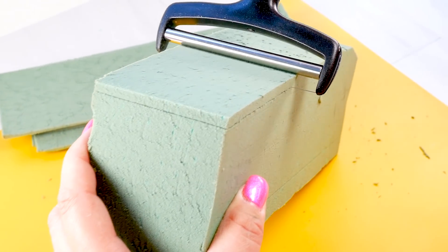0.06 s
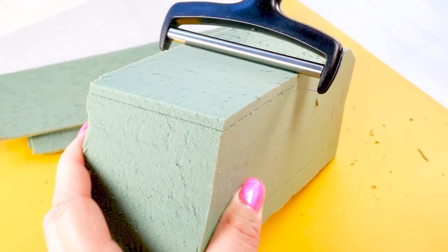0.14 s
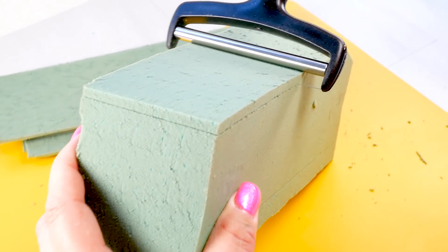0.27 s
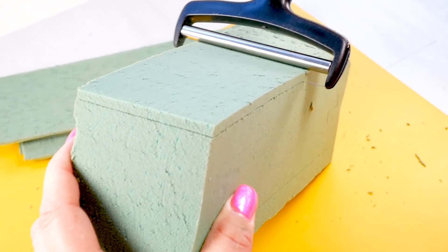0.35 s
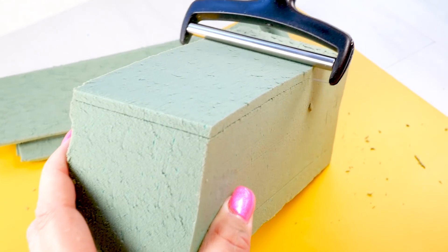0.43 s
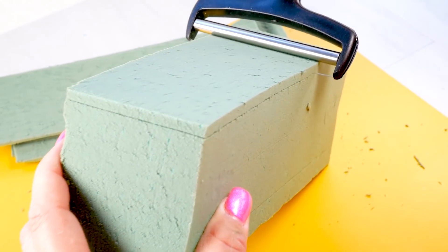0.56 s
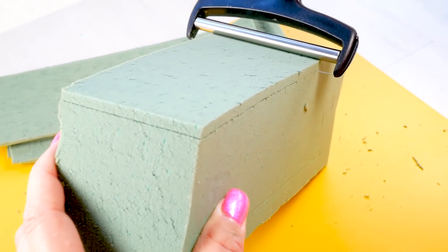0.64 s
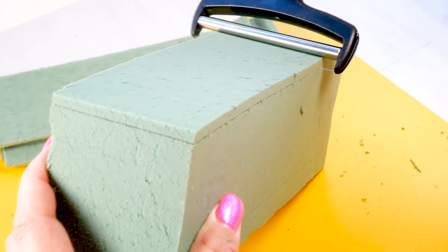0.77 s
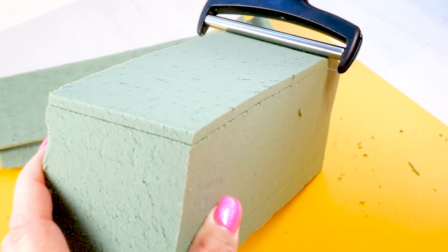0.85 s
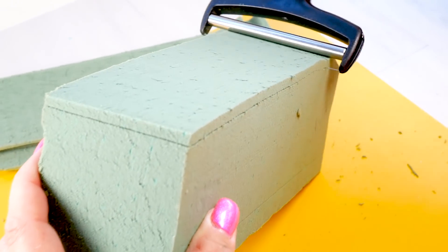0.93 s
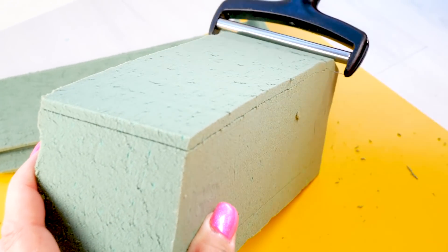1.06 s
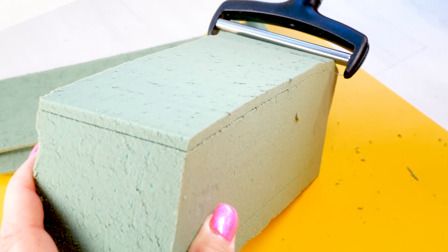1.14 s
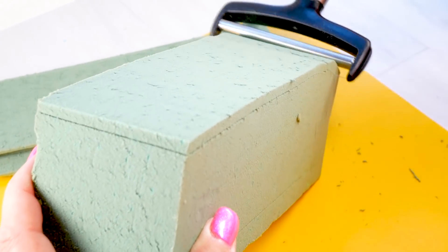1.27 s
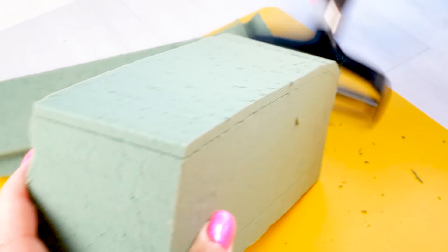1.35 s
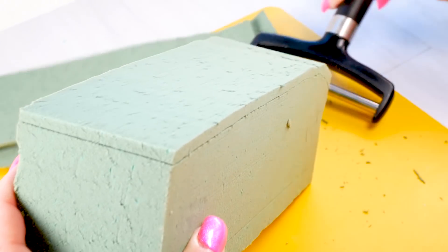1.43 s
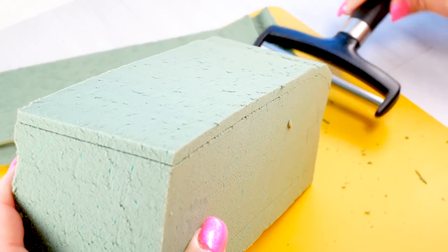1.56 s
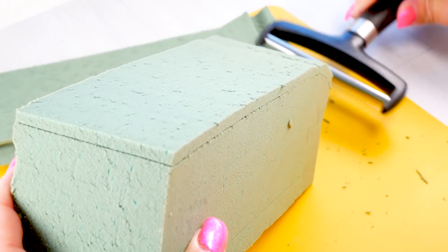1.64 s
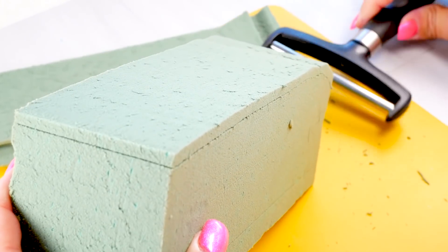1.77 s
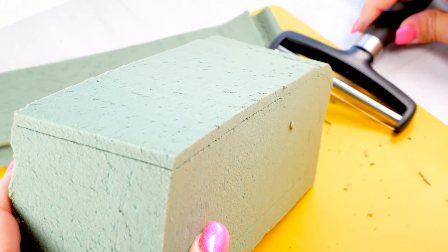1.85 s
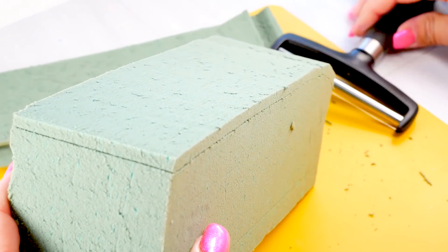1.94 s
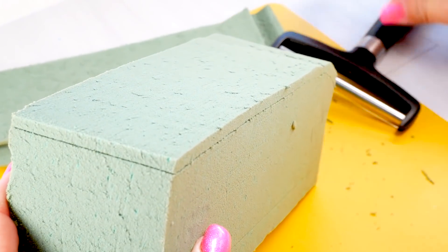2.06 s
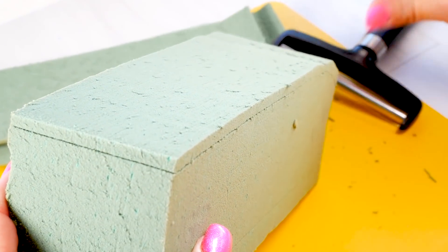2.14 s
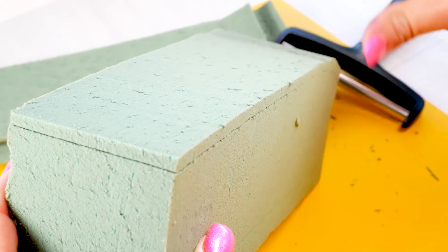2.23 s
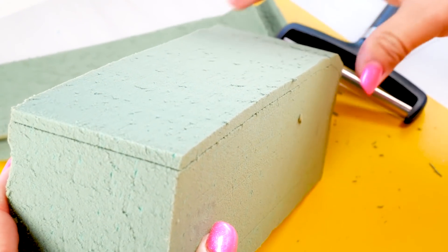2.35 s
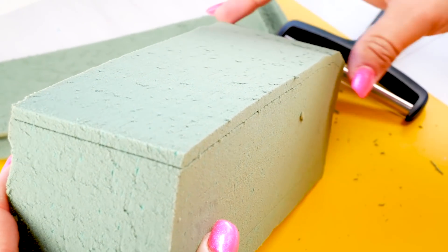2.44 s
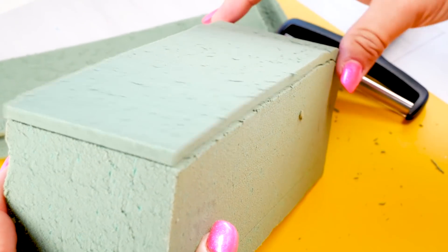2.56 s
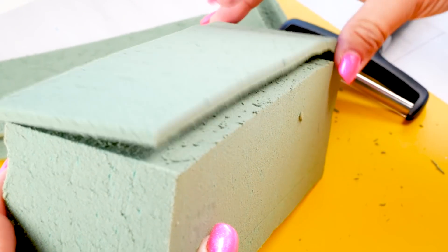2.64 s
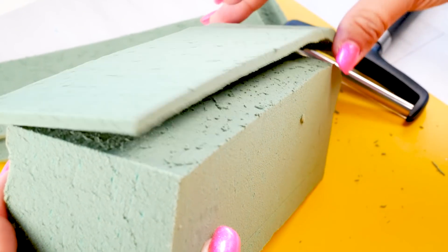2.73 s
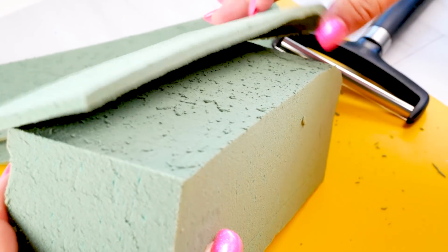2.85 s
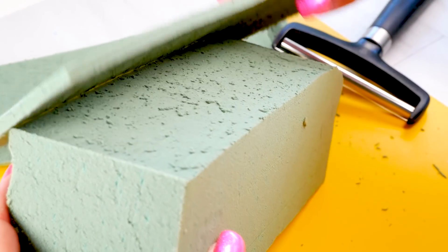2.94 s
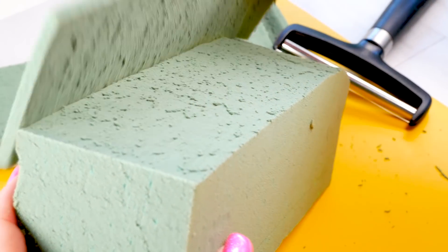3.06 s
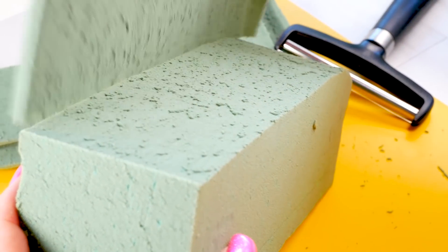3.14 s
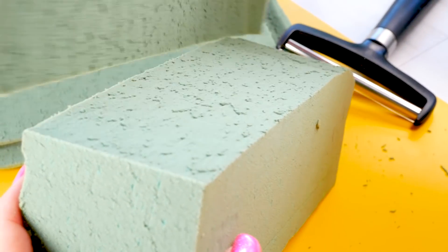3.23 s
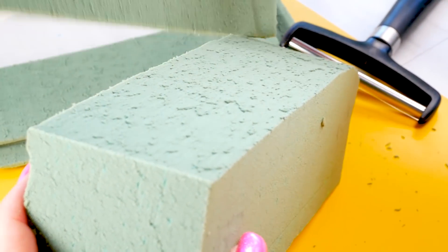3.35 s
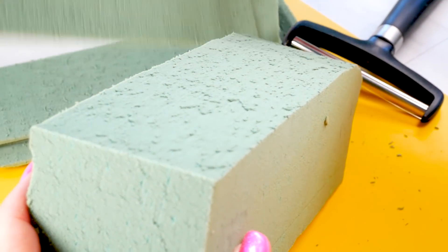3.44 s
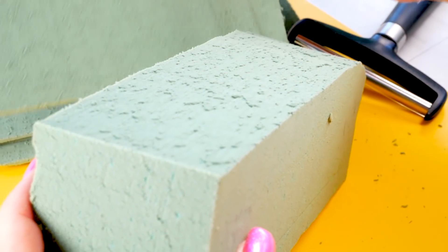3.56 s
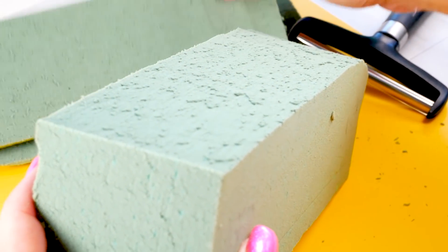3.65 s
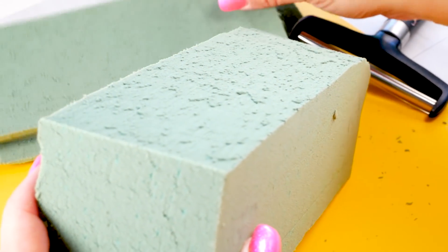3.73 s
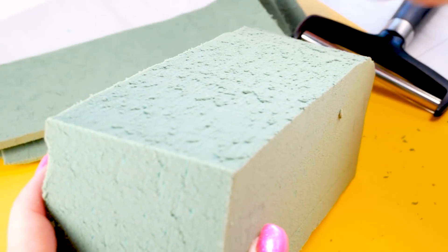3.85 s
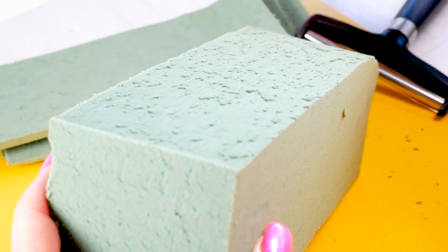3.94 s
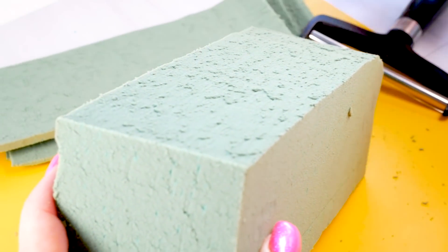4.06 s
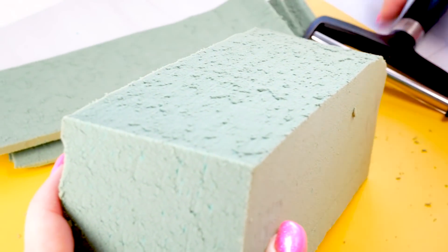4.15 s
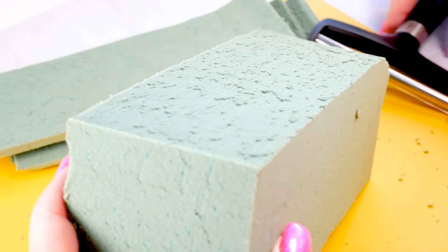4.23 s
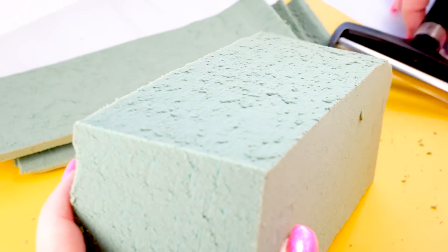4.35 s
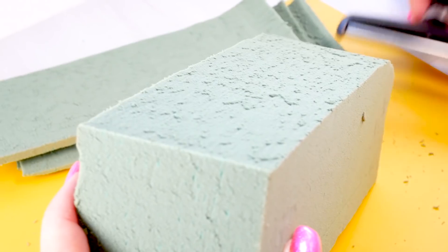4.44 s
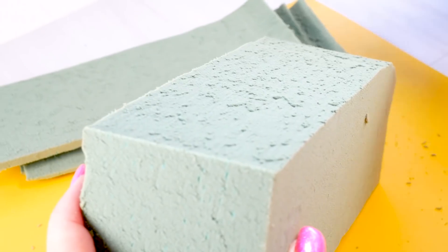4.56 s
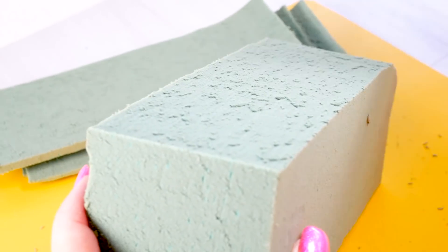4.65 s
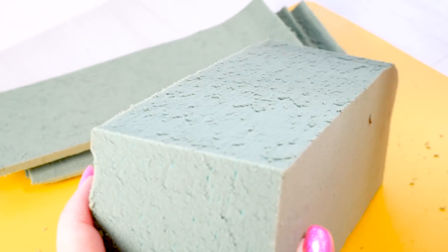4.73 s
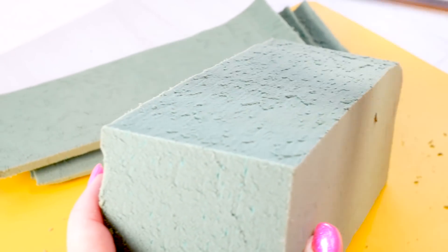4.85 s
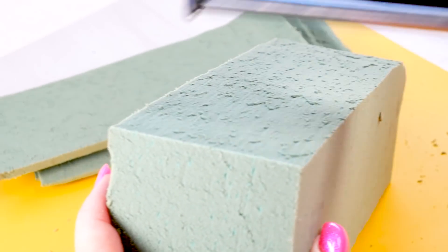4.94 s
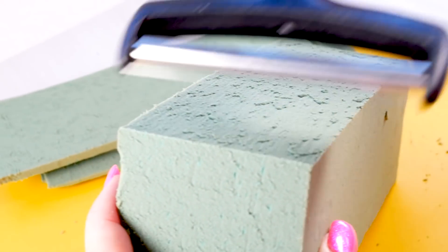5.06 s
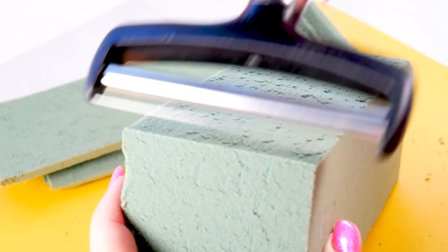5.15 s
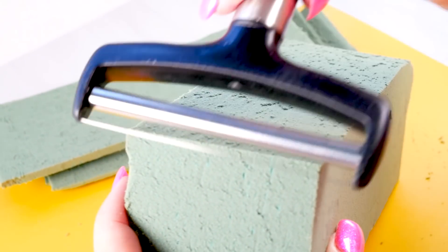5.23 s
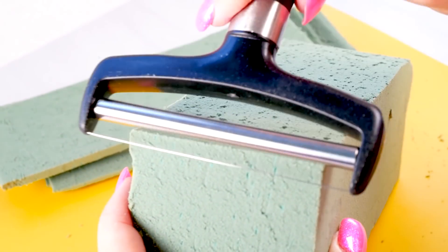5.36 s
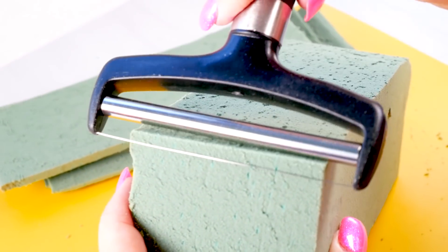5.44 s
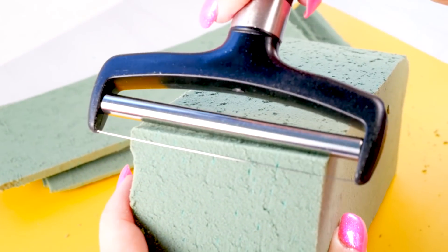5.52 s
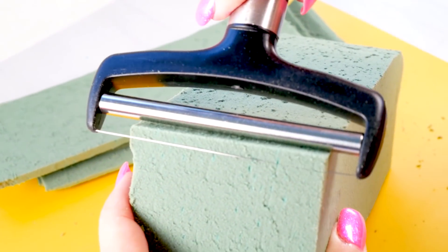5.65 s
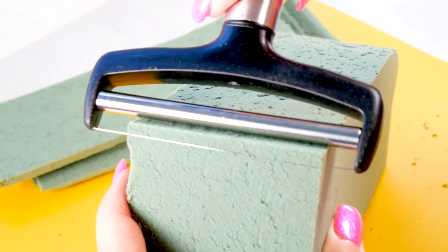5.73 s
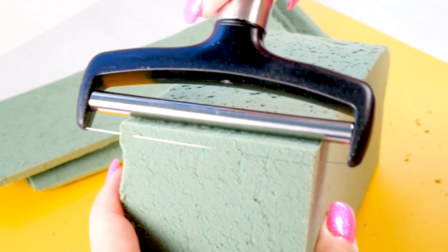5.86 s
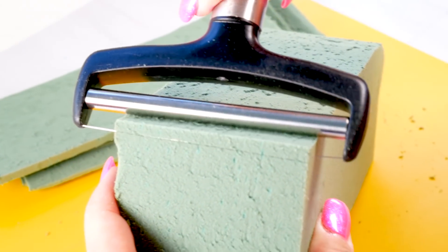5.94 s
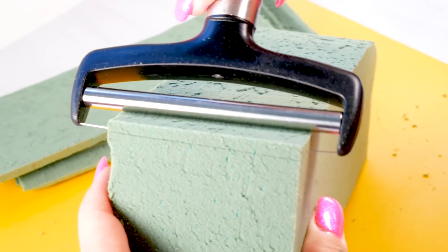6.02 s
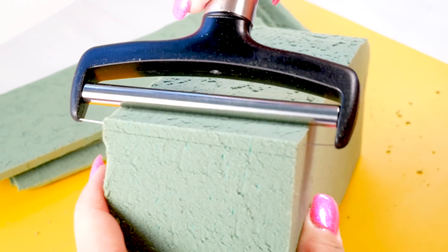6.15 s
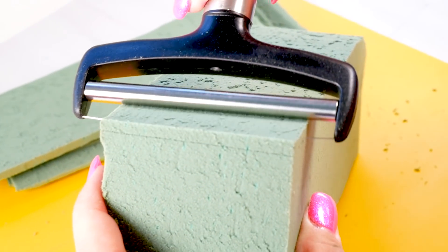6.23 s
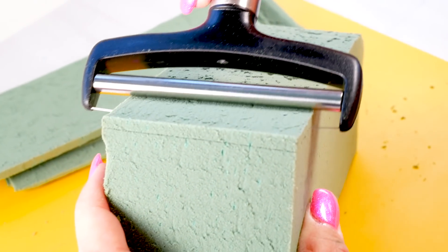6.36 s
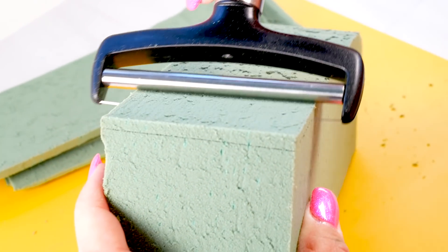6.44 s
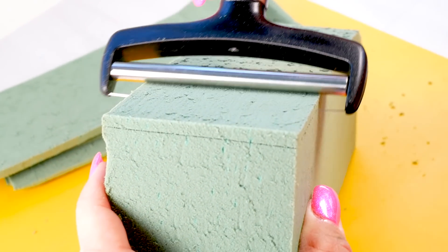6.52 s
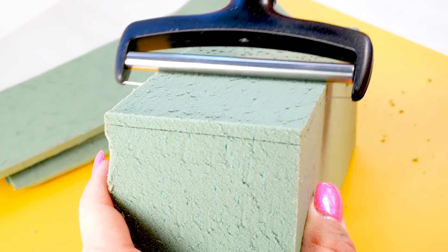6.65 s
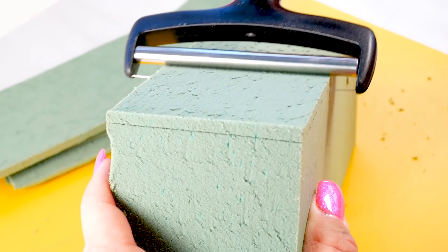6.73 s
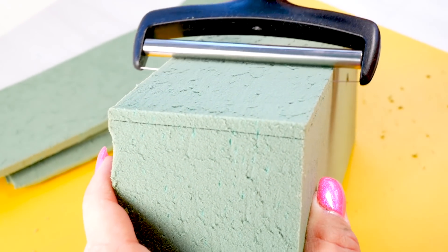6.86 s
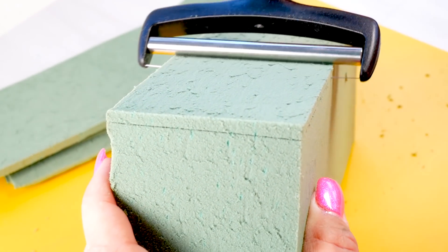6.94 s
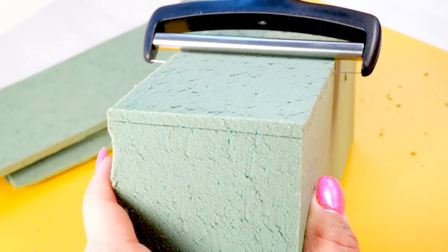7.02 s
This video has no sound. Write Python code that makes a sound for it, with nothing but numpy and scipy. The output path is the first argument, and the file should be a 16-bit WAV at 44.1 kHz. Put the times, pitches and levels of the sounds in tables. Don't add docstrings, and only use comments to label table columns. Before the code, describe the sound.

A wire slicer rasps crunchily through dry foam, pops out with a metallic rattle, knocks down on a table, then soft scuffs precede a new cut.

```python
import sys
import numpy as np
from scipy import signal
from scipy.fft import rfft, irfft, next_fast_len
from scipy.io import wavfile
from scipy.ndimage import uniform_filter1d

SR = 44100
rng = np.random.default_rng(int(sys.argv[2]) if len(sys.argv) > 2 else 0)


def persist_wave(psi):
    counts = np.round(np.clip(psi, -1, 1) * 32767).astype(np.int16)
    wavfile.write(sys.argv[1], SR, np.atleast_2d(counts).T)


def linear_from_db(decibels):
    return 10 ** (np.asarray(decibels, float) / 20)


N = 312669

# (low [Hz], high [Hz])
ZONES_HZ = [
    [130, 370],
    [620, 1000],
    [1500, 3200],
    [4800, 15500],
]
# (frequency [Hz], density [dB per Hz])
CUT_COLOUR = [(71, -47), (126, -6), (390, -3.5), (469, -3.5), (881, 3), (1190, -2.5), (1460, -4),
              (2390, -3.5), (3580, -2), (4480, -7), (9710, -8.5), (14000, -14), (15500, -19)]
RUB_COLOUR = [(71, -38.5), (120, 0.5), (200, -7.5), (265, 1), (541, -7.5), (748, -10), (917, -7.5),
              (2160, -10), (2870, -11), (9510, -10), (13000, -11.5), (15500, -24.5)]
ROOM_COLOUR = [(12, -36), (20, -9.5), (37, -3.5), (64, -6.5), (98, -21.5), (171, -19.5), (238, -19),
               (274, -12.5), (315, -29), (393, -29.5), (491, -29.5), (534, -19), (649, -31), (834, -32),
               (1300, -37), (15500, -51)]
# (frequency [Hz], rms [dB])
HUM = [(60, -54), (120, -74), (176, -65)]
# (frequency [Hz], side minus mid [dB])
WIDTH = [(60, -23), (110, -25), (200, -25), (380, -27), (700, -18.5), (1290, -10.5), (2380, -13),
         (4400, -11), (8120, -18), (15000, -7.5)]
# (time [s], left minus right [dB])
SLICER_PAN = [(1.6, 0), (1.7, -2.4), (2.0, -2.4), (2.02, 0), (4.1, 0), (4.2, -3), (4.5, -3), (4.6, 0)]

# (frequency [Hz], level [dB], t60 [s])
FRAME = [(964, -12, 0.07), (1350, -21, .05), (1580, -12, 0.04), (1756, -19.5, 0.035), (2100, -20.5, 0.046),
         (2480, -15, 0.04), (2916, -18.5, 0.027), (3233, -18.5, 0.028)]
FACE = [(1380, 8, .004)]
TABLE = [(138.9, -24.5, 0.27), (224, -24.5, 0.04), (347, -15, 0.14), (453, -8, 0.028), (750, -27.5, 0.023)]
ROLLER = [(10380, -15, .06), (11800, -19, .06), (13010, -8, .14), (13335, -12, .16)]
ROLLER_BENDING = [(1480, -2, .04), (3350, -10, .04), (5240, -24, .08)]
# (frequency [Hz], level [dB], t60 [s])
TUBE_LOW = [(2500, -6, .05), (2875, -5, .08), (5060, -3, .12), (5240, -1, .11)]
TUBE_HIGH = [(7270, -4, .12), (7820, 0, .12)]

# (frequency [Hz], width [Hz], lift [dB])
BLOCK_END = [(480, 36, -3.5), (664, 150, 4), (880, 180, 2), (1439, 140, 2.5), (1930, 490, -5.5),
             (2567, 230, -4), (3640, 370, -9), (5220, 200, -12), (7400, 57, -6), (9980, 2500, -6)]
BLOCK_START = [(510, 420, 0.5), (774, 600, -5), (1600, 330, -7.5), (2950, 180, -8.5), (4633, 170, -6.5),
               (6150, 58, 1), (10100, 4300, -6.5)]
SHEET = [(745, 36, 6.5), (1725, 110, -14.5), (2130, 330, -3), (3440, 570, -5.5), (5370, 189, -13),
         (9460, 600, -11)]
SLICER = [(748, 170, -0.5), (1440, 180, -2), (2320, 160, -1.5), (3483, 480, -4), (4800, 190, -1.5)]
SQUEAK = [(2220, 270, 12.36)]
# (from [s], to [s], resonances)
CUT_BODIES = [
    (0, 1.8, BLOCK_END),
    (5.5, 8, BLOCK_START),
]
RUB_BODIES = [
    (1.6, 2.3, SLICER),
    (2.3, 4.1, SHEET),
    (4.1, 5.7, SLICER),
    (4.22, 4.325, SQUEAK),
]

# (time [s], frequency [Hz], width [Hz], lift [dB])
FLAP_FIRST = [(.05, 618, 120, 0.5), (.1, 620, 120, 10.5), (.25, 636, 150, 7), (.5, 719, 200.2, 4),
              (.62, 480, 90, 8.5), (.8, 480, 90, 9), (.86, 870, 120, 7.5), (.97, 813, 150, 2),
              (1.1, 823.5, 200.2, 9.5)]
WIRE_FIRST = [(.1, 2500, 300, -2), (.26, 1500, 250, 0), (.39, 2100, 300, 2.5), (.55, 2100, 400, 0.5),
              (.7, 1587, 300, -5), (.87, 1820, 300, 4.5), (.97, 1700, 300, 1), (1.09, 1807, 300, 11.5),
              (1.15, 1800, 300, 4.5)]
FLAP_SECOND = [(6.0, 802, 200, 0), (6.2, 864, 150, 3.5), (6.4, 604, 150, 3), (6.48, 820, 150, 3),
               (6.62, 712, 200, 6.5), (6.78, 519, 119.8, 6.5), (6.88, 472, 100, 0.5), (6.95, 502, 150, 2),
               (7.09, 572, 150, 3.5)]
WIRE_SECOND = [(6.03, 1750, 250.4, 2), (6.1, 1908, 301, 1.5), (6.25, 1700, 250.4, 4), (6.4, 1681, 301, 2),
               (6.5, 1782, 403, 6), (6.65, 1695, 301, 0), (6.85, 1604, 301, -6), (6.97, 1512, 200, 1.5),
               (7.09, 1500, 200, 3.5)]
WIRE_HIGH = [(6.4, 3000, 399.4, -4.5), (6.6, 3000, 399.4, 2), (6.75, 2950, 399.4, 4),
             (6.9, 2800, 399.4, -2), (7.02, 2870, 399.4, 4.5), (7.09, 2870, 399.4, 3.5)]
FRAME_SLIDE = [(1.78, 1600, 200, 3.5), (1.8, 1600, 200, 8), (1.86, 1500, 200, 5.5), (1.9, 1450, 200, 4),
               (1.92, 1450, 200, 0)]
FRAME_DRAG = [(4.32, 1480, 150, 0.5), (4.36, 1440, 120, 6.5), (4.39, 1400, 120, 8), (4.42, 1500, 200, -1)]
FRAME_LIFT = [(4.51, 852, 100, 8), (4.53, 805, 100, 7.7), (4.57, 587, 100, 10), (4.61, 550, 120, 3)]
FRAME_SET = [(5.495, 1480, 100, 8), (5.52, 1500, 120, 6), (5.56, 1550, 150, 4)]
WIRE_SET = [(5.5, 2240, 100, 3), (5.53, 2250, 80, 8), (5.56, 2300, 120, 4)]
SHEET_FLEX = [(2.9, 1696, 249.3, -3.5), (3.03, 1897, 249.3, -0.5), (3.1, 2090, 250, 10.5),
              (3.16, 1980, 250, 5), (3.25, 1750, 249.3, 3.5)]
SHEET_EDGE = [(3.28, 5010, 600, -5), (3.36, 5420, 600, 6), (3.44, 5530, 600, 9.5), (3.5, 5300, 600, -1.5)]

# (time [s], rasp [dB])
FIRST_PULL = [(0, -35), (.12, -33.5), (.55, -33.5), (.72, -32.5), (.92, -31.5), (1.02, -30.5), (1.12, -35),
              (1.15, -48.5), (1.2, -64)]
EXIT_PULL = [(1.2, -64), (1.26, -61.5), (1.32, -34.5), (1.47, -34.5), (1.53, -54.5), (1.62, -84),
             (1.72, -79.5)]
SECOND_PULL = [(5.56, -62.5), (5.93, -47.5), (6.0, -45), (6.157, -45.5), (6.25, -38.5), (6.42, -39),
               (6.55, -31.5), (6.88, -36), (7.1, -35.5)]
# (time [s], peak rasp [dB], rise over 20 dB [s], fall over 20 dB [s], dullness [dB])
FIRST_JERKS = [(.15, -27.5, 0.12, 0.12, 0.5), (.246, -23.5, 0.095, 0.05, 0), (.392, -25.5, 0.38, 0.21, 0.5),
               (.51, -25, 0.95, 0.2, -1), (.63, -28.5, 0.25, 0.13, 1.5), (.812, -32.5, 0.13, 0.26, 6),
               (.878, -19.5, 0.15, 0.049, -2.5), (1.095, -21, 0.14, 0.046, 5)]
EXIT_JERKS = [(1.23, -56, .015, 0.04, -24), (1.262, -53, 0.02, 0.025, -25), (1.346, -19, .045, 0.14, 6.5),
              (1.385, -23.5, 0.14, 0.025, 6), (1.398, -14, .008, 0.012, -5.2),
              (1.426, -15, 0.0074, 0.0089, -3.5), (1.441, -23.5, .006, 0.038, 0.5),
              (1.608, -67, .03, 0.047, -22.5)]
SECOND_JERKS = [(5.721, -46.5, 0.14, 0.11, 0.5), (5.845, -48, 0.22, .05, -8.5), (5.951, -40, .03, .2, -6),
                (6.03, -36.5, 0.00398, .07, -3), (6.09, -29.5, 0.11, .07, -4.5),
                (6.174, -37, 0.0037, 0.11, -3), (6.232, -35, 0.035, 0.18, -3.5),
                (6.366, -28, 0.22, 0.079, 1.5), (6.484, -25.5, 0.073, 0.18, 4.5),
                (6.626, -26.5, 0.13, .25, 4), (6.742, -27.5, 0.07, 0.2, 4), (7.034, -28, 0.28, .25, .5)]
# (time [s], rub [dB])
SLIDE_DRAG = [(1.776, -59.5), (1.78, -52), (1.87, -48), (1.92, -43.5), (1.945, -43), (1.966, -49.5)]
SHEET_DRAG = [(2.48, -73.5), (2.57, -59.5), (2.85, -76), (2.92, -53), (3.17, -49.5), (3.26, -55),
              (3.47, -51), (3.67, -63), (3.9, -64.5)]
# (time [s], peak rub [dB], rise over 20 dB [s], fall over 20 dB [s], dullness [dB])
SLICER_SCUFFS = [(2.02, -37.5, 0.0093, 0.036, 11.5), (2.103, -56.5, 0.032, 0.043, 30),
                 (4.305, -54, 0.065, 0.055, -16.5), (4.342, -35.5, 0.025, 0.051, -4.5),
                 (4.38, -45, .05, 0.051, 4), (4.483, -42, 0.057, 0.048, -2), (4.521, -61, 0.019, 0.063, 23),
                 (4.57, -60.5, 0.034, 0.057, 22.5), (4.715, -84, .05, .07, -43),
                 (4.726, -59, 0.0049, 0.062, 17), (5.35, -43, 0.0061, 0.0079, -9),
                 (5.371, -43, .006, 0.036, -4.5), (5.46, -51, 0.053, 0.36, -0.5),
                 (5.502, -45.5, .02, 0.12, -8), (5.689, -50.5, .004, .12, -20)]
SHEET_SCUFFS = [(2.672, -45.5, 0.062, 0.15, 6.5), (2.93, -40, 0.068, 0.14, 5.5),
                (3.04, -46.5, 0.27, 0.17, -1), (3.125, -47, 0.14, 0.037, 2),
                (3.205, -47.5, 0.038, 0.059, -6.5), (3.322, -48, 0.083, 0.081, -6.5),
                (3.426, -50, 0.12, 0.089, 2.5), (3.575, -54, 0.083, .1, -4.5),
                (3.735, -44, 0.073, 0.074, 1), (3.806, -49, .008, 0.049, 3)]
# (steady [dB], share of steady swing [1], jerk [dB], share of jerk swing [1], share of dullness [1])
CUT_LAW = [(-6.5, 1.26, -16, .9, -0.48), (-9.5, 1.1, -9.5, 1, 0.88), (-3.5, 0.89, -2.5, 1, -0.079),
           (4, 0.91, -0.5, 1, -.1)]
EXIT_LAW = [(-9, 1.3, -21, .9, 0.91), (-16.5, 1.1, -14.5, 1, 0.92), (8.5, 3, -2, 1, -0.49),
            (-4, 1.21, 1, 0.92, -0.5)]
SLICER_LAW = [(-8, 1.2, -12.5, 0.31, 0.55), (-4.5, 1.1, -10.5, 1, 0.89), (-1, 0.9, -1, 0.99, 0.014),
              (-11.5, 1.2, -9.5, 1, -0.72)]
SHEET_LAW = [(-12, 0.56, -13.5, .9, 0.57), (-18.5, .8, -10, 1, 0.26), (-1.5, 0.92, 0, 1, 0.058),
             (-1.5, 1, 1.44, 1, -0.66)]

# (time [s], frame [dB], high ring re frame [dB], tick re frame [dB], low ring re frame or high [dB])
CHINKS = [(1.399, -18, -27, -1, -23), (1.403, -19, -25, 10, -12), (1.4194, -12.5, 5, 10.5, -26),
          (1.425, -17.5, 0, 7.5, 0), (1.429, -21.5, -24, 14.5, -7), (1.439, -23, -12, 5.5, 2),
          (1.455, -25, -12, -0.5, -4), (1.489, -35.5, -14.5, -8.5, 11), (1.706, -55, -47, -22, 6),
          (4.585, -62, 9.5, 6.5, -18.5), (5.349, -57, -29, 8, -18.5), (5.3708, -40.5, -8, 3.5, 1),
          (5.375, -55, -20, 0, 7), (5.398, -44, -19, 2, -9), (5.428, -56, -31, -13, 5),
          (5.4465, -43, -26, 0, -4), (5.502, -42, -28, -1, -2)]
# (time [s], frame [dB], table, roller, tick re frame [dB])
DROPS = [(1.7777, -42.5, -8, -36.5, -7.5), (1.911, -35, -16.5, -38.5, 10.5), (1.939, -39.5, -17, -40, 14.5),
         (1.9666, -2, -3, -43.5, -15), (1.9755, -9.5, -7, -41, -26.5), (1.979, -22, 13.5, -15, -20),
         (1.9949, -3, -5, -44, -22.5), (2.004, -20, 8.5, -28, -24.5), (2.014, -27, 8, -38, -23.5),
         (2.031, -43, -3, -28, 5), (4.722, -52, 13, -40, -21), (4.751, -53.5, 15.5, -38, -6)]
# (time [s], frame [dB])
TICKS = [(3.8, -66), (4.3398, -42), (4.346, -50.5), (4.368, -42), (4.378, -50), (4.392, -53), (4.454, -55),
         (4.472, -55.5), (4.502, -62), (5.519, -56), (5.571, -58), (5.668, -52), (5.688, -48.5),
         (5.783, -51), (5.946, -48.5), (6.03, -37.5), (6.075, -38), (6.113, -39), (6.172, -36.5),
         (6.232, -33.5)]
# (table, high ring, tick, low ring re frame [dB])
TICK_KIND = (-24, -40, 16, -26)
# (time [s], lower group [dB], upper group [dB])
STRIKES = [(1.402, -32, -34), (1.424, -36, -28), (1.439, -25, -30), (1.49, -40, -46), (1.979, -50, -46),
           (2.008, -46, -58), (5.3745, -53, -64), (5.398, -60, -70), (5.4465, -58, -72)]

CHINK_TABLE_DB = -9.5
TICK_T60_S, TICK_BODY_DB, TICK_BODY_T60_S = .008, 5, .014
RATTLE_DB = 3
CUT_SLIP, RUB_SLIP = 1.3, .4
SLIP_UNEVEN = .2
WIRE_MEAN_DB, HAND_MEAN_DB = -35, -50
ROUNDNESS = 1.18
JOLT_S, JOLT_DB, JOLT_HZ, JOLT_T60_S = 1.432, -38, 58, 0.15
ROOM_DB = -49.5
ROOM_T60_S, MID_WET_DB, SIDE_WET_DB, WALL_CUT_HZ = 0.23, -13.5, -9, 9800
TOP_HZ = 16400


def rms_one(x):
    return x / np.sqrt(np.mean(x ** 2) + 1e-20)


def at_hz(points, hz):
    table_hz, db = np.transpose(points)
    return np.interp(np.log(hz), np.log(table_hz), db)


def coloured(x, gain_db):
    size = next_fast_len(N)
    hz = np.fft.rfftfreq(size, 1 / SR) + 1
    return irfft(rfft(x, size) * linear_from_db(gain_db(hz)), size)[..., :N]


def drift(rate_hz):
    r = np.exp(-80 * np.pi * rate_hz / SR)
    noise = rng.standard_normal(N // 40 + 2002)
    slow = signal.lfilter([1], [1, -2 * r, r * r], noise)[2000:]
    return np.interp(np.arange(N) / 40, np.arange(len(slow)), rms_one(slow))


def ring(clicks, hz, t60_s):
    r, w = linear_from_db(-60 / (t60_s * SR)), 2 * np.pi * hz / SR
    return signal.lfilter([0, np.sin(w)], [1, -2 * r * np.cos(w), r * r], clicks + 1e-18)


def to_stereo(mid, side):
    return mid + coloured(side, lambda hz: at_hz(WIDTH, hz)) * [[1], [-1]]


def room_tone():
    noise = coloured(rng.standard_normal((2, N)), lambda hz: at_hz(ROOM_COLOUR, hz))
    t = np.arange(N) / SR
    hum = np.zeros(N)
    for hz, db in HUM:
        level = np.sqrt(2) * linear_from_db(db + 1.2 * drift(6))
        hum += level * np.sin(2 * np.pi * hz * t + 1.4 * drift(5.5))
    return linear_from_db(ROOM_DB) * rms_one(noise) + hum * [[1], [0]]


def effort(strokes, mean_db):
    t = np.arange(0, N + 64, 64) / SR
    power = np.full((4, len(t)), 1e-12)
    for drag, jerks, law in strokes:
        steady_db, steady_share, jerk_db, jerk_share, dull_share = np.transpose(law)[:, :, None]
        s, db = np.transpose(drag)
        swing_db = np.interp(t, s, db) - mean_db
        dragging = (t >= s[0]) & (t <= s[-1])
        power += linear_from_db(2 * (mean_db + steady_db + steady_share * swing_db)) * dragging
        for peak_s, peak_db, rise_s, fall_s, dull_db in jerks:
            distance = np.where(t < peak_s, (peak_s - t) / rise_s, (t - peak_s) / fall_s)
            below_db = 20 * distance ** ROUNDNESS
            power += linear_from_db(2 * (peak_db + jerk_db - jerk_share * below_db + dull_share * dull_db))
    return [np.interp(np.arange(N) / SR, t, 10 * np.log10(p)) for p in power]


def slips(per_s, t60_s, slowness):
    wobble = rms_one(uniform_filter1d(rng.random(N) - .5, size=1500))
    count = np.floor(np.cumsum(per_s * (1 + SLIP_UNEVEN * wobble)) / SR)
    starts = (np.diff(count, prepend=0) > 0) * (.25 + .75 * rng.random(N))
    return 1 + slowness * signal.lfilter([1], [1, -linear_from_db(-60 / (t60_s * SR))], starts + 1e-18)


def in_bodies(snaps, bodies, wander_db):
    out = snaps.copy()
    for start_s, end_s, peaks in bodies:
        span = slice(round(start_s * SR), round(end_s * SR))
        for hz, width_hz, lift_db in peaks:
            r = np.exp(-np.pi * width_hz / SR)
            zeros = [(1 - r * r) / 2, 0, (r * r - 1) / 2]
            poles = [1, -2 * r * np.cos(2 * np.pi * hz / SR), r * r]
            rung = signal.lfilter(zeros, poles, snaps[:, span] + 1e-18)
            out[:, span] += linear_from_db(lift_db + wander_db * drift(4.9)[span]) * rung
    return out


def gliding(snaps, curves):
    out = np.zeros_like(snaps)
    for curve in curves:
        s, hz, width_hz, lift_db = np.transpose(curve)
        at = np.arange(round(s[0] * SR), min(round(s[-1] * SR), N))
        turn = np.exp(2j * np.pi * np.cumsum(np.interp(at / SR, s, hz)) / SR)
        r = np.exp(-np.pi * np.mean(width_hz) / SR)
        slow = signal.lfilter([1 - r], [1, -r], snaps[:, at] / turn)
        level = 2 * linear_from_db(np.interp(at / SR, s, lift_db)) * signal.windows.tukey(len(at), .1)
        out[:, at] += level * np.real(slow * turn)
    return out


def crushing(zones_db, colour, bodies, glides, cells_per_s, size_db, clump_db, patchy_db, slip):
    born = rng.random((2, N)) < cells_per_s / SR
    sizes = linear_from_db(size_db * np.minimum(rng.exponential(1, (2, N)), 5)) * rng.choice([-1, 1], (2, N))
    slowness = slip * np.clip((-22 - zones_db[2]) / 16, .2, 1)
    clumps = linear_from_db(clump_db * (drift(21) + 0.4 * drift(120)))
    snaps = slips(73, 0.032, slowness) * born * sizes * clumps
    rung = in_bodies(snaps, bodies, wander_db=2.5) + gliding(snaps, glides)
    size = next_fast_len(N)
    hz = np.fft.rfftfreq(size, 1 / SR) + 1
    spectrum = rfft(rung, size) * linear_from_db(at_hz(colour, hz))
    corners_hz = np.concatenate(ZONES_HZ)
    out = 0
    for zone_hz, zone_db in zip(ZONES_HZ, zones_db):
        share = np.interp(np.log(hz), np.log(corners_hz), np.isin(corners_hz, zone_hz))
        zone = linear_from_db(patchy_db * drift(28)) * irfft(spectrum * share, size)[:, :N]
        out = out + linear_from_db(uniform_filter1d(zone_db, size=70)) * rms_one(zone)
    return out


def wire_cut():
    strokes = [(FIRST_PULL, FIRST_JERKS, CUT_LAW), (EXIT_PULL, EXIT_JERKS, EXIT_LAW),
               (SECOND_PULL, SECOND_JERKS, CUT_LAW)]
    glides = [FLAP_FIRST, WIRE_FIRST, FLAP_SECOND, WIRE_SECOND, WIRE_HIGH]
    return crushing(effort(strokes, WIRE_MEAN_DB), CUT_COLOUR, CUT_BODIES, glides, cells_per_s=11000,
                    size_db=1.7, clump_db=0.15, patchy_db=0.56, slip=CUT_SLIP)


def echoes(x):
    t = np.arange(int(.5 * SR)) / SR
    tails = rng.standard_normal((2, len(t))) * linear_from_db(-60 * t / ROOM_T60_S) * (t > .003)
    tails = signal.sosfilt(signal.butter(1, WALL_CUT_HZ, fs=SR, output="sos"), tails)
    tails = tails / np.sqrt(np.sum(tails ** 2, axis=1, keepdims=True))
    return signal.fftconvolve(x[None], tails, axes=1)[:, :N]


def contacts():
    rows = [(s, db, CHINK_TABLE_DB, high, tick, low) for s, db, high, tick, low in CHINKS]
    rows += [(s, db, table, high, tick, high) for s, db, table, high, tick in DROPS]
    rows += [(s, db, *TICK_KIND) for s, db in TICKS]
    return np.transpose(rows)


def burst(at, level_db, t60_s, low_hz, high_hz):
    clicks = np.zeros(N)
    clicks[at] = linear_from_db(level_db)
    envelope = signal.lfilter([1], [1, -linear_from_db(-60 / (t60_s * SR))], clicks + 1e-18)
    dying = envelope * rng.standard_normal(N) + 2 * clicks
    return signal.sosfilt(signal.butter(2, [low_hz, high_hz], "band", fs=SR, output="sos"), dying)


def knocks():
    s, frame_db, table_db, roller_db, tick_db, bending_db = contacts()
    at, out = np.round(s * SR).astype(int), np.zeros(N)
    # (modes, level re frame [dB], contact [s], looseness)
    struck = [(FACE + FRAME, 0, .0002, 0), (TABLE, table_db, .0006, 0),
              (ROLLER, roller_db, 0, .5), (ROLLER_BENDING, bending_db, 0, 1)]
    for modes, rel_db, contact_s, loose in struck:
        chance_db = rng.normal(0, 1.0, (len(at), len(modes)))
        body = 0
        for k, (hz, level_db, t60_s) in enumerate(modes):
            clicks = np.zeros(N)
            clicks[at] = linear_from_db(frame_db + rel_db + level_db + chance_db[:, k]) * (-1) ** (k + 1)
            body = body + ring(clicks, hz, t60_s)
        touch = np.hanning(int(contact_s * SR) + 3)
        out += linear_from_db(loose * RATTLE_DB * drift(90)) * np.convolve(body, touch / touch.sum())[:N]
    out += burst(at, frame_db + tick_db, TICK_T60_S, 1700, 9000)
    out += burst(at, frame_db + tick_db + TICK_BODY_DB, TICK_BODY_T60_S, 2500, 4200)
    out += burst(at, frame_db + table_db - 7.5, 0.045, 340, 2200)
    return out


def tube():
    s, *groups_db = np.transpose(STRIKES)
    out = np.zeros(N)
    for modes, group_db in zip([TUBE_LOW, TUBE_HIGH], groups_db):
        clicks = np.zeros(N)
        clicks[np.round(s * SR).astype(int)] = linear_from_db(group_db)
        out += sum(linear_from_db(db) * ring(clicks, hz, t60_s) for hz, db, t60_s in modes)
    return out * linear_from_db(RATTLE_DB * drift(90))


def jolt():
    click = np.zeros(N)
    click[round(JOLT_S * SR)] = linear_from_db(JOLT_DB)
    return ring(click, JOLT_HZ, JOLT_T60_S) + ring(click, 2.1 * JOLT_HZ, JOLT_T60_S)


def hand_rub():
    strokes = [(SLIDE_DRAG, SLICER_SCUFFS, SLICER_LAW), (SHEET_DRAG, SHEET_SCUFFS, SHEET_LAW)]
    glides = [FRAME_SLIDE, FRAME_DRAG, FRAME_LIFT, FRAME_SET, WIRE_SET, SHEET_FLEX, SHEET_EDGE]
    return crushing(effort(strokes, HAND_MEAN_DB), RUB_COLOUR, RUB_BODIES, glides, cells_per_s=9000,
                    size_db=2.8, clump_db=0.98, patchy_db=0.68, slip=RUB_SLIP)


def panned(x, pan_db):
    return x * linear_from_db(pan_db / 2 * [[1], [-1]])


def scene():
    cut = wire_cut()
    rub = hand_rub()
    hits = knocks() + jolt() + tube()
    wet = echoes(hits + cut[0] + rub[0]) * linear_from_db([[MID_WET_DB], [SIDE_WET_DB]])
    steady = to_stereo(*(cut + room_tone() + wet))
    slicer_pan_db = np.interp(np.arange(N) / SR, *np.transpose(SLICER_PAN))
    return steady + panned(to_stereo(*rub) + hits, slicer_pan_db)


def top_cut(x):
    return signal.sosfilt(signal.butter(12, 15970, fs=SR, output="sos"), x)


def record(dry):
    rounded = 0.79 * np.tanh(dry / 1.02)
    mix = signal.sosfilt(signal.cheby2(10, 50, TOP_HZ, fs=SR, output="sos"), rounded)
    return top_cut(mix)


dry = scene()
out = record(dry)
persist_wave(out)
```